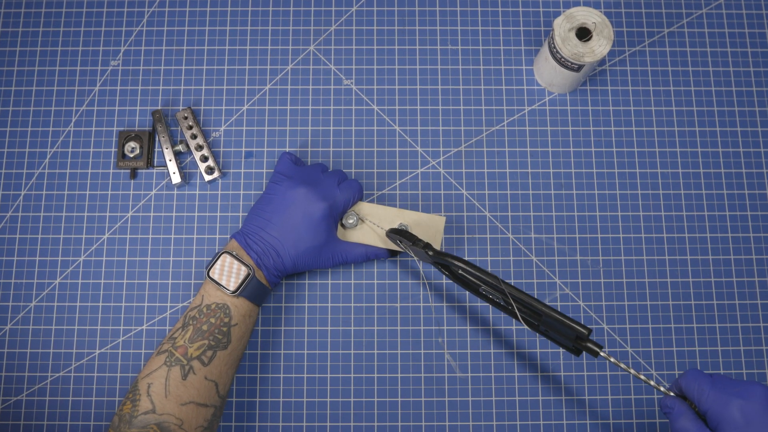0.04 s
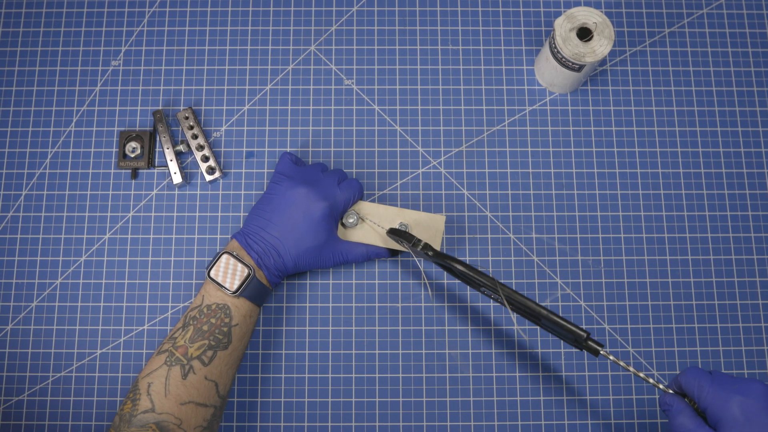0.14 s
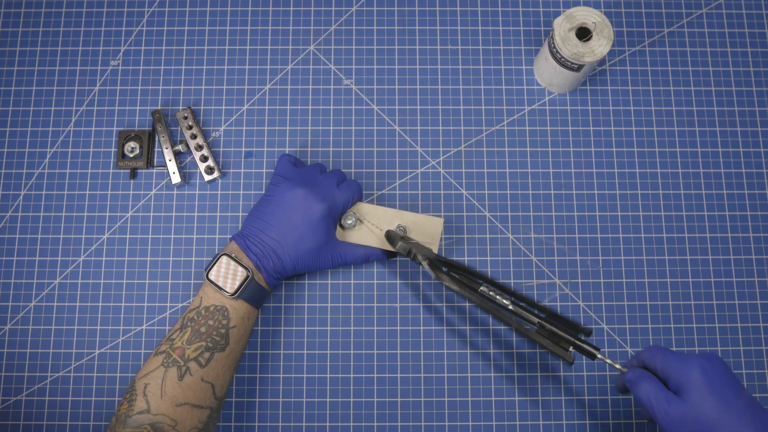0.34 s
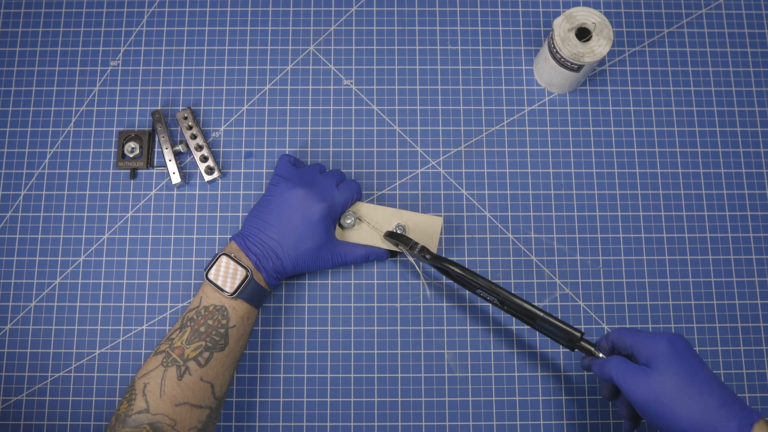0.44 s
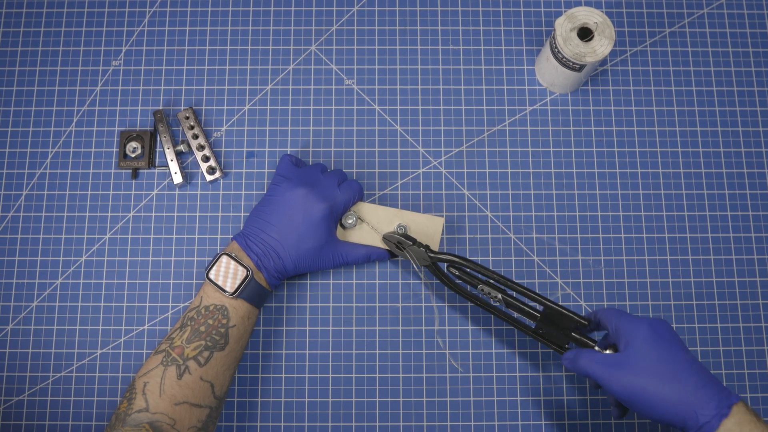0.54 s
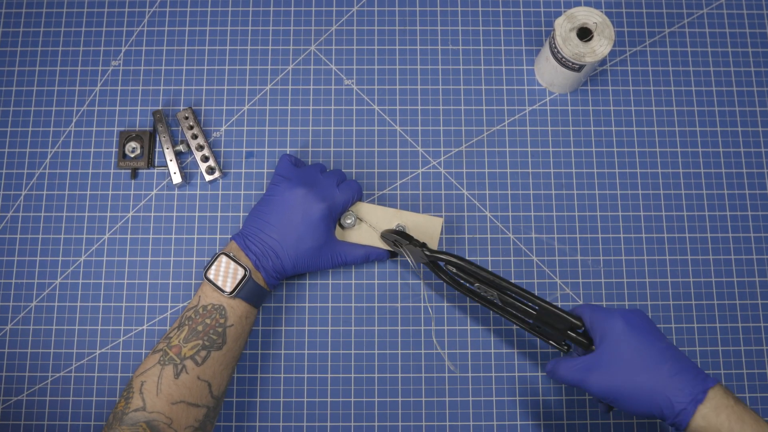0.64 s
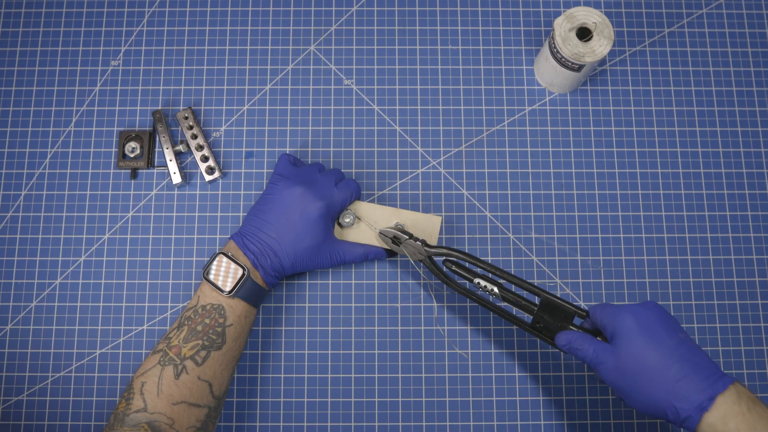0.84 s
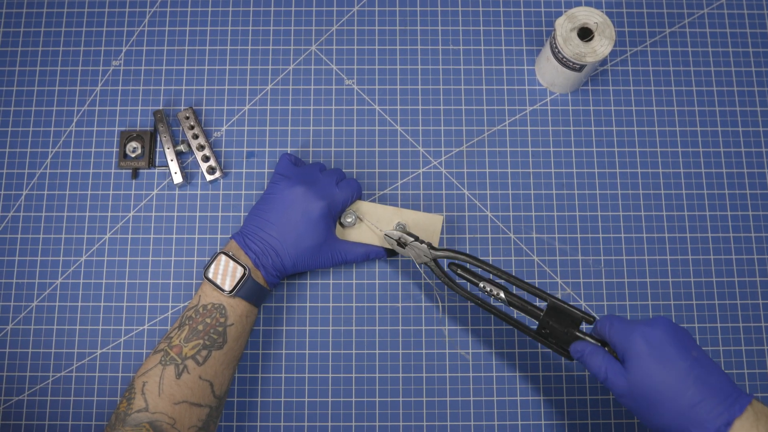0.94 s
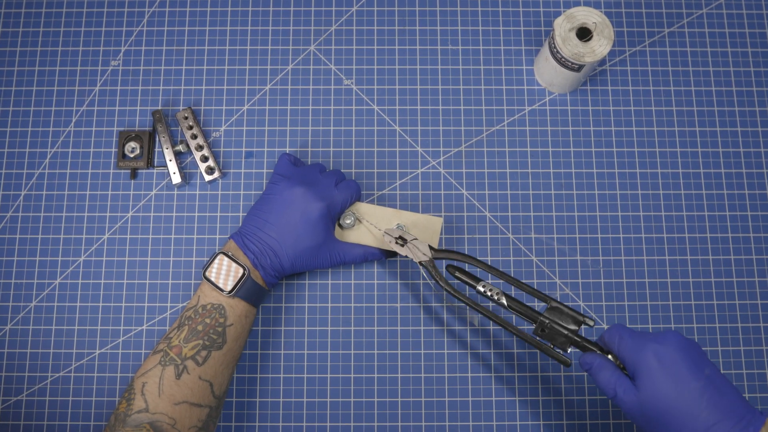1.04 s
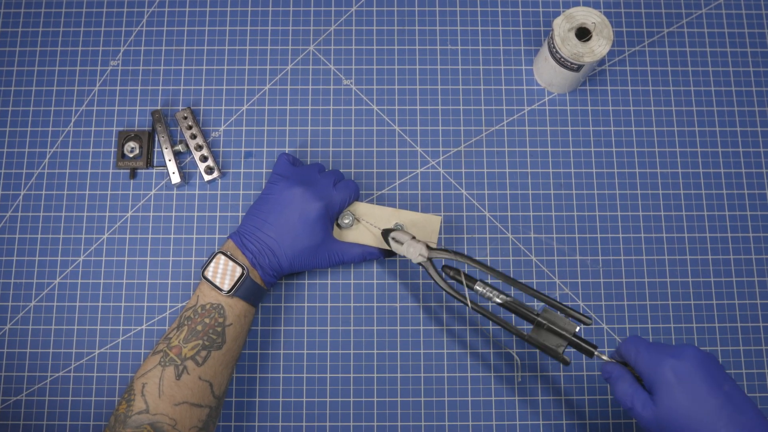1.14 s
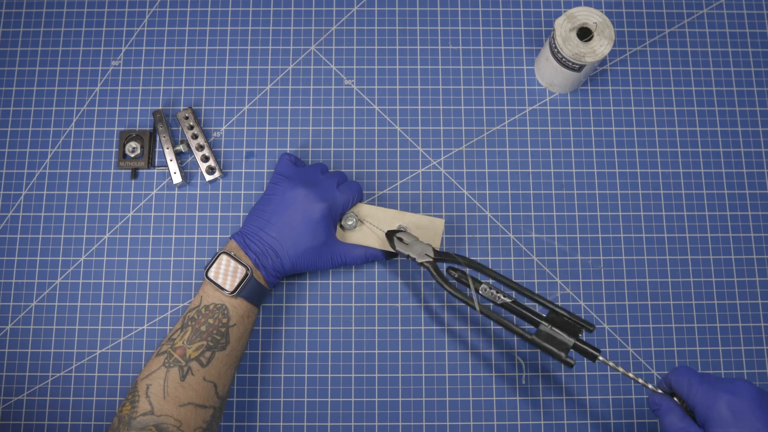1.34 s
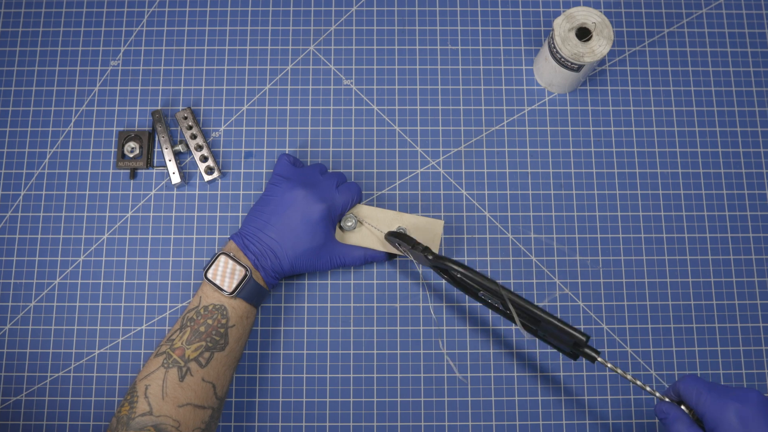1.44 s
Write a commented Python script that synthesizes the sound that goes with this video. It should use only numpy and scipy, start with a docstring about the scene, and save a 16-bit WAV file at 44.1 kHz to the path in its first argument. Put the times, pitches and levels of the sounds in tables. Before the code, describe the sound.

Wire-twisting pliers clicking and scraping as their spiral rod spins, one sharp clack early on

```python
"""Steel clicks and chatter, gritty scraping, wooden knocks and dull thuds, over bench rumble and room hiss.
Wire-twisting pliers spin on their spiral rod above a workbench, close to a two-port microphone.
Impulses ring decaying modes of steel, block and bench; the rod scraping through its nut adds rubbing noise.
Rumble and hiss are coloured noise; a short room tail surrounds the events, and the left port hears them late."""
import sys
import numpy as np
from scipy import signal
from scipy.fft import rfft, irfft
from scipy.io import wavfile
from scipy.ndimage import uniform_filter1d

SR = 44100
rng = np.random.default_rng(int(sys.argv[2]) if len(sys.argv) > 2 else 0)


def waveform_to_disk(signal):
    """Save audio, clipped to [-1, 1], as 16-bit WAV at the path in sys.argv[1]."""
    frames = np.transpose(np.atleast_2d(signal))
    scaled = np.clip(frames, -1, 1) * 32767
    samples = np.round(scaled).astype(np.int16)
    wavfile.write(sys.argv[1], SR, samples)


def attenuation_scalar(level_db):
    """Turn a level in dB into a linear amplitude multiplier (20 dB per decade)."""
    decades = np.asarray(level_db, float) / 20
    return 10 ** decades


N = 66150  # samples, 1.5 s


def level(x, db):
    """Scale to an rms level."""
    return x * attenuation_scalar(db) / np.sqrt(np.mean(x ** 2))


def curve(rows):
    """Gain over time, interpolated in dB between (time_s, gain_db) rows."""
    rows = np.array(rows)
    return attenuation_scalar(np.interp(np.arange(N) / SR, rows[:, 0], rows[:, 1]))


def coloured(points):
    """Noise of rms 1 with its spectrum drawn through (freq_hz, level_db) points."""
    points = np.array(points)
    freq_hz = np.arange(N // 2 + 1) * SR / N + 1e-3
    db = np.interp(np.log(freq_hz), np.log(points[:, 0]), points[:, 1], left=-90, right=-90)
    return level(irfft(rfft(rng.standard_normal(N)) * attenuation_scalar(db), N), 0)


def bandpass(x, hz, octaves):
    """Gentle band reaching the given octaves to either side of its centre."""
    edges = np.clip([hz * 2 ** -octaves, hz * 2 ** octaves], 50, 18000)
    return signal.sosfilt(signal.butter(2, edges, "band", fs=SR, output="sos"), x)


def highpass(x, hz):
    """Keep the treble above a corner frequency."""
    return signal.sosfilt(signal.butter(2, hz, "high", fs=SR, output="sos"), x)


def ring(modes, extra_db, size):
    """Exponentially decaying sine modes, each with a random sign and slight detune."""
    pitch_hz, db, t60_s = np.array(modes).T[:, :, None]
    t = np.arange(size) / SR
    sign = np.sign(rng.standard_normal((len(modes), 1)))
    detuned_hz = pitch_hz * (1 + 0.0028 * rng.standard_normal((len(modes), 1)))
    decay = np.exp(-np.log(1000) * t / t60_s)
    gain = sign * attenuation_scalar(db + extra_db[:, None])
    return np.sum(gain * np.sin(2 * np.pi * detuned_hz * t) * decay, axis=0)


def add(out, start_s, x, peak_db):
    """Mix an event in at its time and peak level."""
    i = int(start_s * SR)
    out[i:i + len(x)] += (x * attenuation_scalar(peak_db) / np.max(np.abs(x)))[:N - i]


# spectrum of the room hiss, relative: freq_hz [Hz], level_db [dB per Hz]
HISS_SPECTRUM = [(71, -37.5), (120, -1), (454, -6), (592, -9.5), (1070, -10.5), (1260, -14), (1520, -18),
                 (10400, -29), (16000, -45)]
HISS_DB = -73.5  # rms


def room_hiss():
    """Steady noise, strongest in the low range and falling towards the treble."""
    return attenuation_scalar(HISS_DB) * coloured(HISS_SPECTRUM)


# handling rumble in the bench: time_s [s], level_db [dB rms]
RUMBLE_LEVEL = [(0.0, -52), (0.09, -60), (0.142, -57), (0.232, -58), (0.266, -67), (0.346, -57),
                (0.38, -62), (0.434, -52), (0.526, -60), (0.558, -54), (0.73, -65), (0.91, -48),
                (0.93, -53), (0.998, -48), (1.09, -54), (1.186, -49), (1.24, -55), (1.306, -50),
                (1.362, -61), (1.408, -52), (1.454, -51), (1.5, -59)]
# spectrum of the rumble, relative: freq_hz [Hz], level_db [dB per Hz]
RUMBLE_SPECTRUM = [(12, -20), (24, 2.5), (38, 6.5), (60, -8), (90, -11.5), (150, -20.5), (300, -35.5),
                   (600, -55)]


def bench_rumble():
    """Handling shakes the bench: deep noise that swells and sinks."""
    return curve(RUMBLE_LEVEL) * coloured(RUMBLE_SPECTRUM)


def room(x):
    """Short diffuse tail of the workshop: decaying noise of unit energy after a 3 ms gap."""
    t60_s = 0.1
    t = np.arange(int(.3 * SR)) / SR
    tail = rng.standard_normal(len(t)) * np.exp(-np.log(1000) * t / t60_s) * (t > .003)
    return signal.fftconvolve(x, tail / np.sqrt(np.sum(tail ** 2)))[:N]


def blows(rows, modes, scatter_db, grit_db, grit_s):
    """A push softened by its contact time rings wood, followed by a short gritty shake."""
    favour_gain_db, favour_oct = 12, .3
    out, t = np.zeros(N), np.arange(3000) / SR
    mode_hz = np.array(modes)[:, 0]
    for start_s, peak_db, contact_ms, favour_hz in rows:
        push = attenuation_scalar(grit_db) * rng.standard_normal(len(t)) * np.exp(-t / grit_s)
        push[0] = 1
        soft = (t * np.exp(-t * 1000 / max(contact_ms, .02)))[:900]
        favour_db = favour_gain_db * np.exp(-(np.log2(mode_hz / favour_hz) / favour_oct) ** 2)
        body = ring(modes, favour_db + scatter_db * rng.standard_normal(len(modes)), size=12000)
        add(out, start_s, signal.fftconvolve(np.convolve(push, soft), body), peak_db)
    return out


# modes of the bench top: pitch_hz [Hz], level_db [dB, relative], t60_s [s]
BENCH_MODES = [(104, -9.5, 0.13), (129.6, -10, 0.19), (190, -0.5, 0.08), (271, 4.5, 0.053),
               (337, 1.5, 0.077), (520, 1, 0.03), (704, 8, 0.024), (900, 3, 0.052)]
# thuds: start_s [s], peak_db [dB], contact_ms [ms, push start to its peak], favour_hz [Hz]
BENCH_THUDS = [(.122, -52.5, 3.2, 122), (.434, -50, 0.46, 193), (.611, -51.5, 0.33, 133),
               (.809, -46, 0.51, 494), (.9045, -35.5, 0.37, 183), (.920, -49, 0.35, 190),
               (1.188, -41.5, 0.14, 520)]


def bench_thuds():
    """Mostly soft, long pushes ring the low modes of the bench top."""
    return blows(BENCH_THUDS, BENCH_MODES, scatter_db=4.0, grit_db=-20, grit_s=0.016)


# modes of the wooden block: pitch_hz [Hz], level_db [dB, relative], t60_s [s]
BLOCK_MODES = [(385, -14, .03), (598.6, -4, 0.038), (774.6, -7.5, 0.039), (1080, -10.5, 0.032),
               (1280, 9, 0.01), (1950, 14.5, 0.0067), (2500, 7, 0.024), (3240, -7, .012)]
# knocks: start_s [s], peak_db [dB], contact_ms [ms, push start to its peak], favour_hz [Hz]
BLOCK_KNOCKS = [(.2218, -34.5, 0.02, 1280), (.4003, -23, 0.067, 780), (.4337, -26, 0.1, 1110),
                (.440, -43, 0.158, 791), (.4435, -51, 0.25, 1140), (.466, -38, 0.39, 503),
                (.488, -44.5, .2, 486), (.517, -50, 0.033, 2220), (.525, -64, 0.049, 2280),
                (.562, -50.5, 0.25, 680), (.734, -53.5, .03, 2200), (.9085, -37, 0.025, 2000),
                (1.052, -55, 0.2, 900), (1.403, -47, 0.1, 740)]


def block_knocks():
    """Short pushes ring the quickly damped modes of the wooden block."""
    return blows(BLOCK_KNOCKS, BLOCK_MODES, scatter_db=6.0, grit_db=-27, grit_s=0.012)


# modes of the pliers' steel, also rung by the clicks: pitch_hz [Hz], level_db [dB, relative], t60_s [s]
STEEL_MODES = [(1560, -15.5, 0.086), (1952, -9, 0.03), (2280, -5, .04), (2320, -9.5, .085),
               (2530, -7, 0.024), (2935, -9, 0.052), (3218, -13.5, 0.028), (3937, -8, .04),
               (4300, -8.5, .03), (5184, -7.5, 0.026), (6020, -8.5, .03), (6385, -2.5, 0.036),
               (6830, 1, 0.019), (7200, -3.5, 0.026), (7740, -5.5, 0.036), (8300, -8.5, 0.037),
               (9170, -12.5, 0.033), (9850, -15.5, 0.016), (10400, -15, 0.037), (11100, -9.5, 0.036),
               (12300, -9.5, 0.033), (13600, -17, .03), (14900, -17, .03)]
SPLIT_HZ = 4700  # modes below this are weighted apart
# rod scraping through its nut: time_s [s], gain_db [dB]
SCRAPE_GAIN = [(0, -87), (.09, -88), (.17, -79), (.21, -69.5), (.25, -67.5), (.32, -60), (.36, -71),
               (.39, -66), (.45, -61.5), (.50, -73), (.56, -68.5), (.63, -72.5), (.68, -85), (.73, -82),
               (.79, -69.5), (.86, -73), (.89, -75), (.95, -72.5), (1.0, -75.5), (1.04, -76.5),
               (1.06, -68.5), (1.10, -65.5), (1.14, -62), (1.17, -67.5), (1.25, -65), (1.30, -71),
               (1.345, -75.5), (1.40, -72.5), (1.43, -91), (1.5, -87)]
# spectrum of the rubbing noise, relative: freq_hz [Hz], level_db [dB per Hz]
RUB_SPECTRUM = [(150, -4.5), (400, -10.5), (1000, -6), (2400, -4), (4500, -8), (6800, -4), (11000, -11),
                (16000, -15.5)]


def scrape(spots=5):
    """Uneven slips at several contact spots ring the steel, over broad rubbing noise in gusts."""
    slips_per_s, spread_db = 790, 2  # all spots together; mean excess of a slip
    low_mode_db, rub_db, gust_db = -8, 4, 1.6
    low_db = (np.array(STEEL_MODES)[:, 0] < SPLIT_HZ) * low_mode_db
    rung = np.zeros(N)
    for _ in range(spots):
        chance, side, size = rng.random((3, N))
        slip_gain = np.sign(side - .5) * attenuation_scalar(-spread_db * np.log(size + 0.00046))
        slips = (chance < slips_per_s / spots / SR) * slip_gain
        spot_db = low_db + 6 * rng.standard_normal(len(STEEL_MODES))
        rung += signal.fftconvolve(slips, ring(STEEL_MODES, spot_db, size=6000))[:N]
    # random steps of 500 samples, smoothed
    gust = uniform_filter1d(np.repeat(rng.standard_normal(N // 500 + 1), 500), 200)[:N]
    rub = attenuation_scalar(gust_db * gust) * coloured(RUB_SPECTRUM)
    return curve(SCRAPE_GAIN) * (level(rung, -1) + attenuation_scalar(rub_db) * rub)


# steel clicks: start_s [s], peak_db [dB], low_db [dB, weight of modes under the split],
# favour_hz [Hz], chatter_s [s, decay of the rebounds]
STEEL_CLICKS = [(0.0937, -58, -35, 6500, .006), (0.11, -54.5, -20, 6600, 0.011),
                (0.1296, -55.5, -6, 9170, 0.0065), (.1797, -29.5, -20, 7020, .003),
                (0.2227, -28.5, -9, 7200, 0.0032), (.2222, -34, 14.5, 3020, 0.0023),
                (.240, -42, -38, 10400, 0.0066), (.2592, -38, -18, 9150, 0.0051),
                (.3200, -48, -4, 6340, .006), (.380, -44, -29, 7570, 0.0091),
                (.4004, -14, -3, 6680, 0.00097), (0.4007, -18.5, 5.5, 5470, 0.0017),
                (.4025, -22, 4.5, 2530, 0.0069), (.406, -27.5, -6.5, 1950, 0.0043),
                (.4084, -35, -15, 7400, 0.0081), (0.4566, -46, -20, 7800, 0.0053),
                (0.4648, -44, -18, 9100, 0.004), (0.5438, -44, -9, 8360, 0.012),
                (.5445, -41, -12, 11100, 0.0056), (0.6433, -34, -14, 7435, .008),
                (0.7675, -47, 4, 6060, .0035), (.8350, -35.5, -9.5, 9170, 0.0076),
                (.905, -37.5, -21, 9170, 0.0071), (0.9091, -28, -6, 6760, 0.0052),
                (0.9113, -33, -32, 6830, 0.0024), (0.9618, -41, -13, 6280, 0.0048),
                (1.0514, -43, 12, 7800, 0.0069), (1.059, -45, -27, 6150, 0.02),
                (1.130, -37.5, -29, 9200, 0.017), (1.142, -34, -16, 8300, 0.0088),
                (1.145, -41.5, -2, 3840, .004), (1.1760, -41, -41, 8300, 0.0086),
                (1.1963, -49, -25, 10600, 0.0075), (1.2115, -27.5, -20, 7740, 0.0046),
                (1.2140, -31.5, -9, 2320, 0.0011), (1.2135, -28.5, -23, 6370, 0.0056),
                (1.242, -48, -22, 8350, 0.012), (1.2887, -44.5, -18, 8630, 0.015),
                (1.3595, -42, -19, 6150, 0.002), (1.3600, -41, 12, 4250, 0.0038),
                (1.3605, -38.5, -18, 12300, 0.0034), (1.361, -48.5, 7.5, 1560, 0.004),
                (1.393, -51, -13, 7260, 0.0041), (1.4033, -46, -2, 3830, 0.0024)]


def click_crack(favour_hz, low_db):
    """Brief noise of the contact: the favoured band, a low band and a sizzle on top."""
    decay_s, sizzle_db = 0.0015, -10
    burst = rng.standard_normal(6000) * np.exp(-np.arange(6000) / SR / decay_s)
    crack = bandpass(burst, favour_hz, 0.47)
    crack = crack + attenuation_scalar(low_db + 10) * bandpass(burst, 3700, 0.82)
    return crack + attenuation_scalar(sizzle_db) * bandpass(burst, 11000, 0.48)


def clicks():
    """A first contact and a dying chatter of rebounds ring the steel; each spot favours other modes."""
    chatter_per_s, chatter_db = 3400, -6.5
    favour_gain_db, favour_oct, scatter_db = 15.5, 0.12, 2
    crack_db, ping_crack_db = 0.5, -14  # blows on the long handles ring cleaner
    out, t = np.zeros(N), np.arange(2048) / SR
    mode_hz = np.array(STEEL_MODES)[:, 0]
    for start_s, peak_db, low_db, favour_hz, chatter_s in STEEL_CLICKS:
        chance, size = rng.random((2, len(t)))
        rebounds = (chance < chatter_per_s / SR) * (2 * size - 1)
        push = rebounds * attenuation_scalar(chatter_db) * np.exp(-t / max(chatter_s, 3e-4))
        push[0] = 1
        favour_db = favour_gain_db * np.exp(-(np.log2(mode_hz / favour_hz) / favour_oct) ** 2)
        extra_db = (mode_hz < SPLIT_HZ) * low_db + favour_db
        extra_db = extra_db + scatter_db * rng.standard_normal(len(mode_hz))
        body = ring(STEEL_MODES, extra_db, size=6000)
        crack_gain = attenuation_scalar(crack_db + ping_crack_db * (favour_hz < SPLIT_HZ))
        body = body / np.max(np.abs(body)) + crack_gain * click_crack(favour_hz, low_db)
        add(out, start_s, signal.fftconvolve(push, body), peak_db)
    return out


def two_ports(mid, near):
    """The left port hears the sound a little later; room treble and some hiss differ between ports."""
    lag_samples, room_apart_db, hiss_apart_db = 0.86, -24, -9
    turn = np.exp(-2j * np.pi * np.arange(N // 2 + 1) * lag_samples / N)
    late = irfft(rfft(mid) * turn, N)
    apart = attenuation_scalar(room_apart_db) * highpass(room(near), 7000)
    apart = apart + attenuation_scalar(hiss_apart_db) * bandpass(room_hiss(), 7000, 1.4)
    return np.array([late + apart, mid - apart])


def scene():
    """Pliers, block and bench close to the microphone, with the room around them."""
    room_db = -15.5
    near = bench_thuds() + block_knocks() + scrape() + clicks()
    mid = near + attenuation_scalar(room_db) * room(near) + bench_rumble() + room_hiss()
    return two_ports(mid, near)


def low_pass(x):
    """Removes everything above the highest recorded frequency."""
    return signal.sosfilt(signal.butter(12, 16680, fs=SR, output="sos"), x)


def record(dry):
    """The recorder sums the bass of both ports and cuts the top."""
    mono_under_hz, top_hz = 450, 16300
    mid, side = (dry[0] + dry[1]) / 2, (dry[0] - dry[1]) / 2
    side = side - signal.sosfiltfilt(signal.butter(2, mono_under_hz, fs=SR, output="sos"), side)
    ports = np.array([mid + side, mid - side])
    mix = signal.sosfilt(signal.ellip(8, .2, 70, top_hz, fs=SR, output="sos"), ports)
    return low_pass(mix)


dry = scene()
out = record(dry)
waveform_to_disk(out)
```